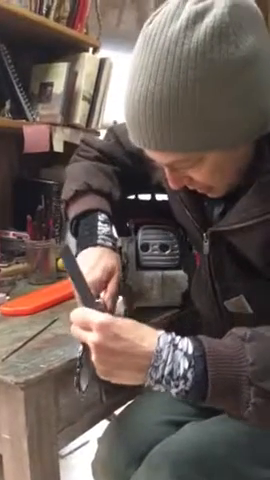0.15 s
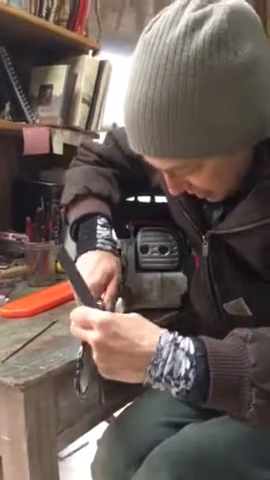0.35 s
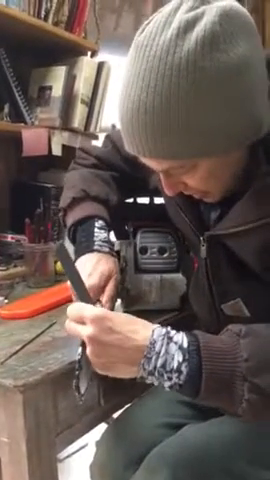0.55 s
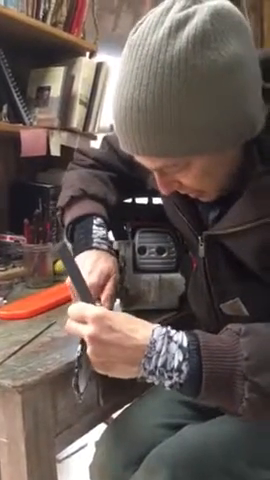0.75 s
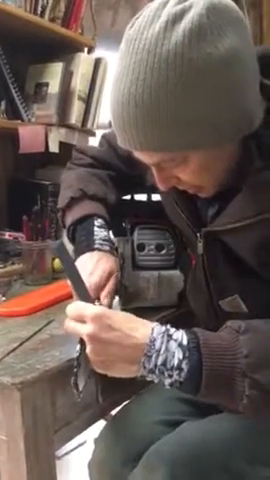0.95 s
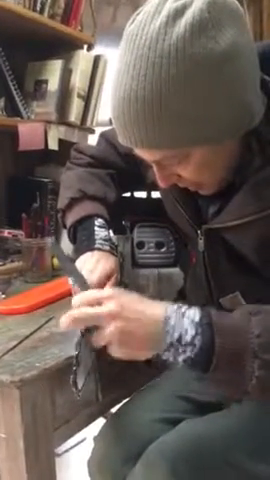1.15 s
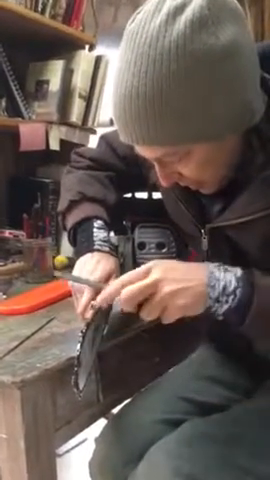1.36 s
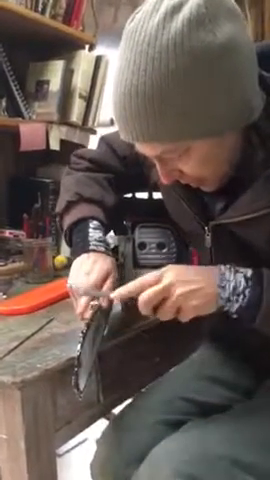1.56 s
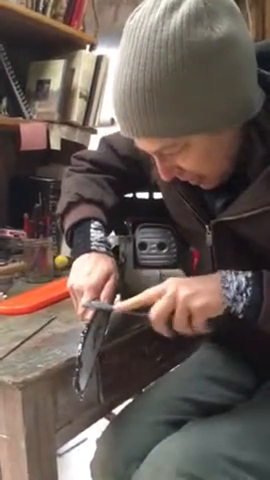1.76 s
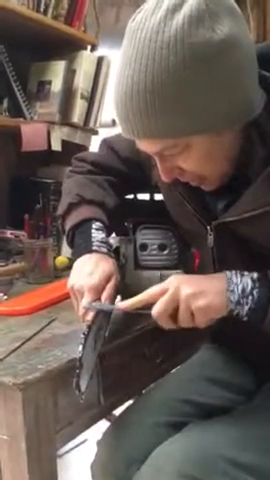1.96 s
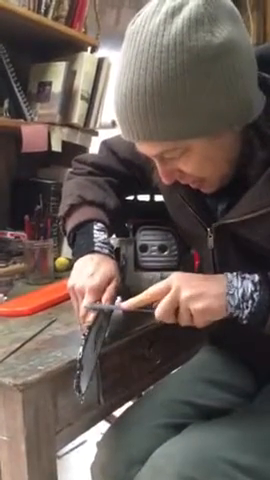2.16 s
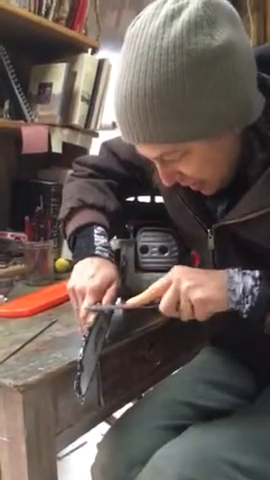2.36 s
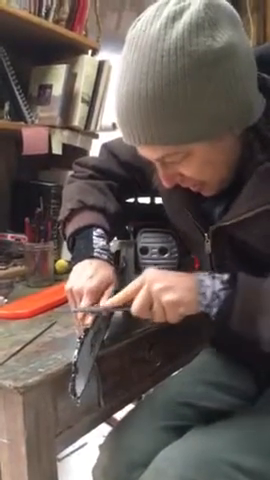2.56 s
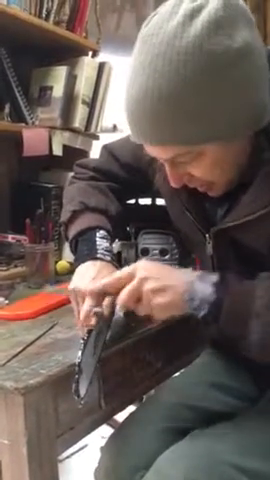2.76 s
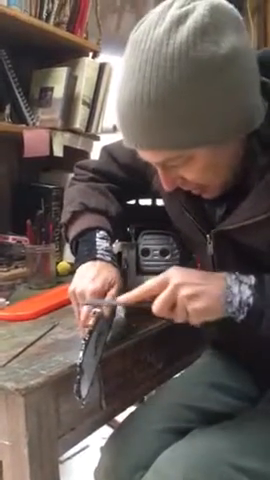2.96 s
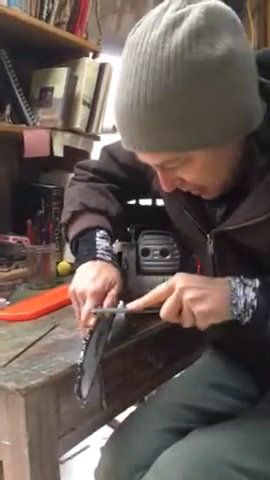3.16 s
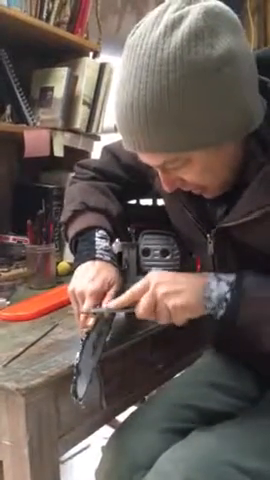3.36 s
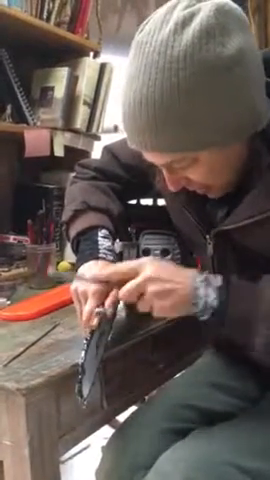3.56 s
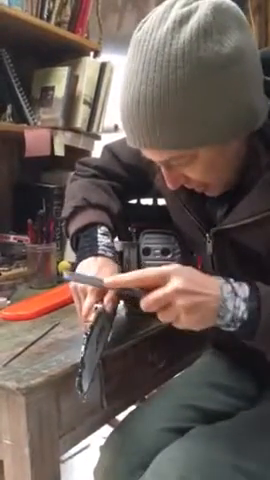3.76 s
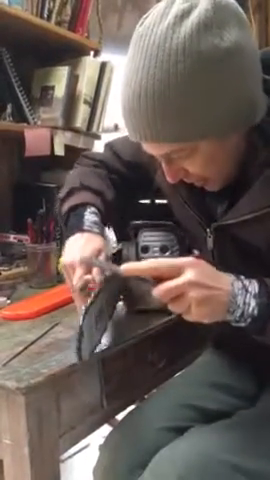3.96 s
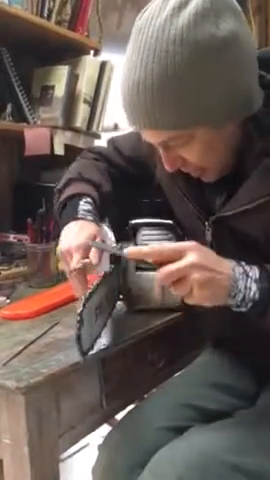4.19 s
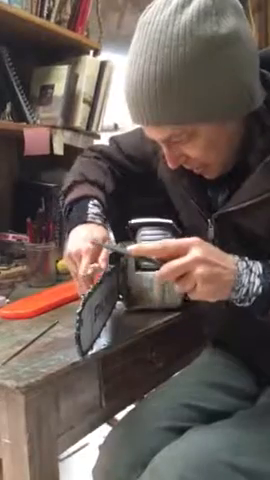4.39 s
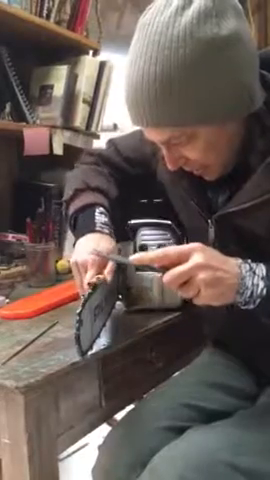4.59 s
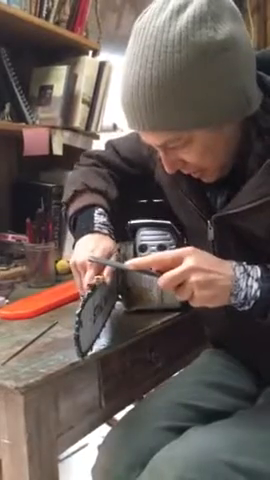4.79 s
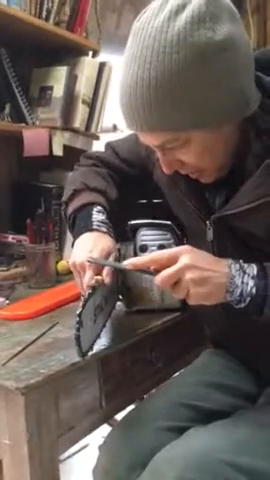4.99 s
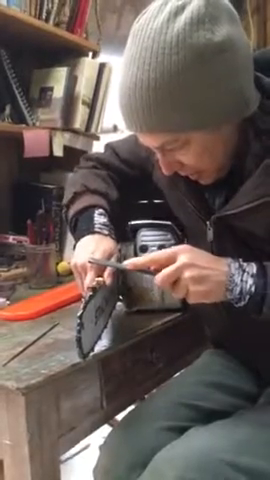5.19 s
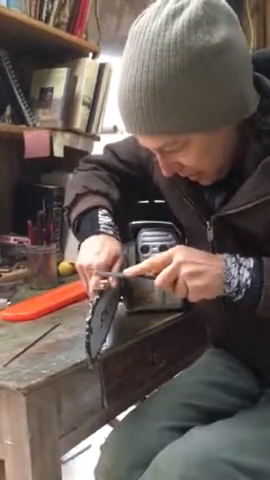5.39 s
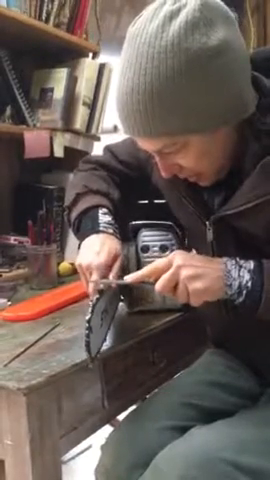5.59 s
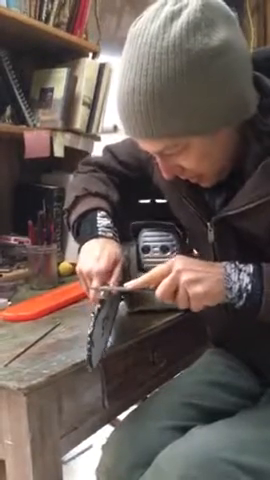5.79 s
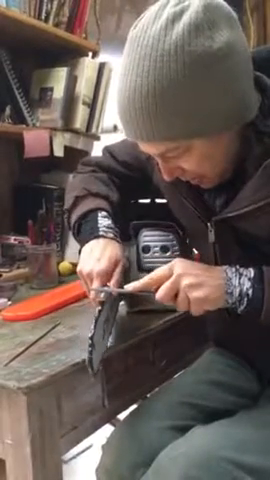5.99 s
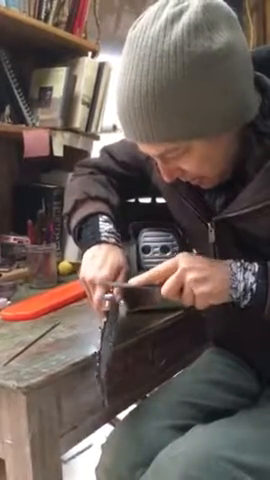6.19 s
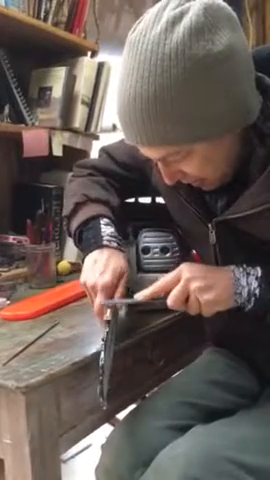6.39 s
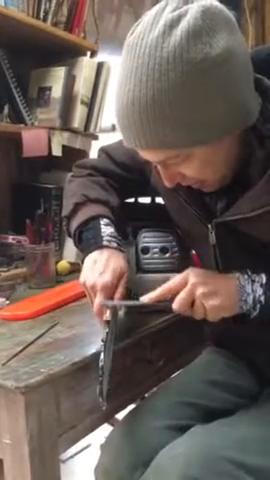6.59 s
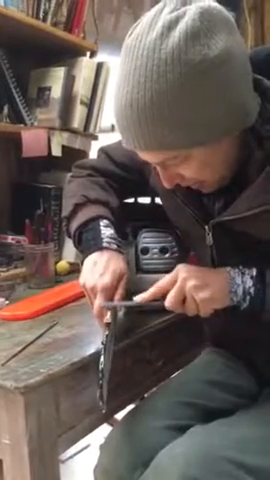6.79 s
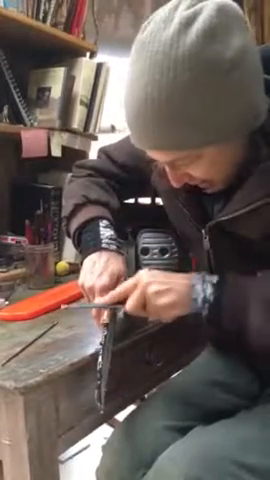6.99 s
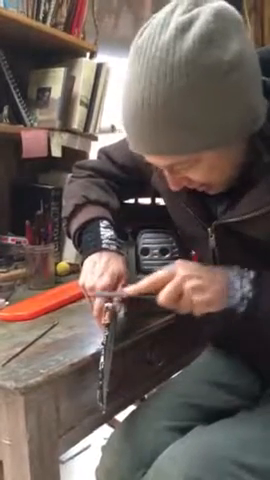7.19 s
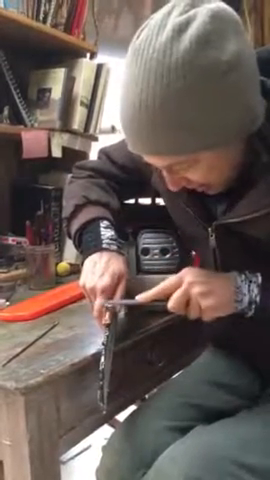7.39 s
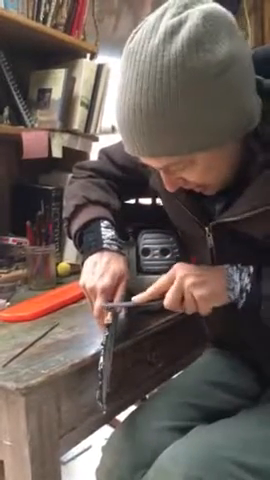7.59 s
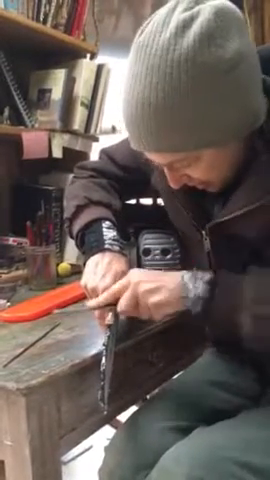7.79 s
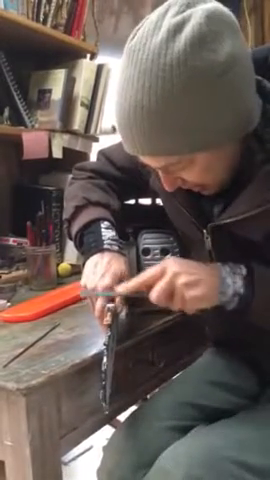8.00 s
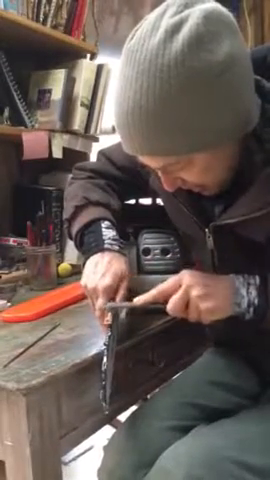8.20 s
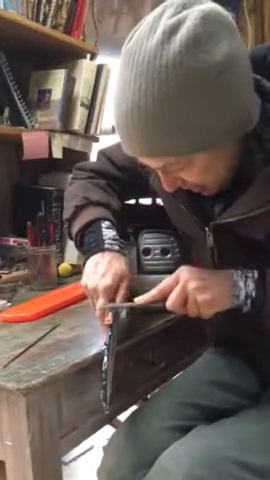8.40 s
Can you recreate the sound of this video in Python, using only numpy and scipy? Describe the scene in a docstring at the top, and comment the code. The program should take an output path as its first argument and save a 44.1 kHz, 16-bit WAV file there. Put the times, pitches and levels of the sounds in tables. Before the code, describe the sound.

Hand filing a saw chain at a workbench, heard by a small nearby microphone. Light ticks, a pause, one hard metallic clack, then two quick uneven rasps, the second squealing briefly. A dull wooden thump and scattered clicks follow, then two lower, coarser scrapes with crisp clicks between. Cloth rustles softly, the bench rumbles faintly, and the short room response is dry and close.

```python
"""A flat steel file dresses a saw chain on a wooden workbench in a small shed.
Damped modes and noise bursts make its clicks on the chain; four strokes rasp as teeth snap off chips
and grit crackles through the resonances of chain and bar, and one stroke squeals at its tooth rate.
Bench modes and low noise make the bumps, a thump and the rumble; wavering sines squeak faintly.
Swelling noise makes the sleeve's swish, and steady noise the quiet background."""
import sys
import numpy as np
from scipy import signal
from scipy.fft import rfft, irfft, next_fast_len
from scipy.io import wavfile
from scipy.ndimage import uniform_filter1d, map_coordinates

SR = 44100
rng = np.random.default_rng(int(sys.argv[2]) if len(sys.argv) > 2 else 0)


def waveform_to_disk(signal):
    """Save audio, clipped to [-1, 1], as 16-bit WAV at the path in sys.argv[1]."""
    frames = np.transpose(np.atleast_2d(signal))
    scaled = np.clip(frames, -1, 1) * 32767
    samples = np.round(scaled).astype(np.int16)
    wavfile.write(sys.argv[1], SR, samples)


N = 372644
TIME = np.arange(N) / SR  # s

# Background spectrum. Each row: frequency in Hz, relative density in dB per Hz.
AMBIENT_SPECTRUM = [(12, -51), (20, -17), (36, -3.5), (60, 1.5), (93, -11.5), (130, -12.5), (228, -19.5),
                    (262, -22), (337, -26.5), (825, -34), (1300, -39), (1960, -39), (2320, -41.5),
                    (4900, -46), (6200, -43.5), (10000, -46.5), (13000, -41.5), (16000, -44)]
AMBIENT_DB = -58

# File meets chain. Each row: start in seconds, level in dB, knock of the bar in dB relative to that level,
# treble sparkle in dB relative to that level before a common cut of 10.5 dB.
CLICKS = [(0.117, -37.5, -23, -11), (0.194, -31.5, -28, -14), (0.306, -32, -27.5, -17),
          (0.319, -37, -26, -16), (0.67, -45.5, -16.5, -22), (0.79, -49.5, -17, -20),
          (1.72, -10.5, -32.5, -13.5), (2.059, -46.5, -16.5, -5), (2.112, -25.5, -27, -13),
          (2.203, -34, -21.5, -16), (2.253, -42, -18.5, -15), (2.588, -17, -26, -20), (3.21, -21, -29, -11),
          (3.927, -30.5, -26, -6.5), (4.615, -36, -20, -23), (4.651, -37, -18, -16.5),
          (4.674, -46, -6, -28), (4.996, -21.5, -30, -19.5), (5.487, -43, -17.5, -16),
          (5.564, -20.5, -36, -21), (5.583, -24.5, -25, -17.5), (6.514, -31, -19.5, -13),
          (6.669, -33.5, -19.5, -21), (6.885, -33, -22, -13), (6.901, -26.5, -25, -15),
          (7.515, -19.5, -25, -16.5), (7.637, -13, -22.5, -18.5), (7.702, -23.5, -27.5, -14),
          (8.359, -32.5, -19, -15)]
# Spectrum of the clack of steel on steel. Each row: frequency in Hz, relative density in dB per Hz.
CLACK_SPECTRUM = [(700, -31), (2500, -21), (4200, -10), (5800, 4), (7500, -1), (8500, 1), (9500, 7),
                  (10500, -2.5), (13000, -0.5), (16000, 3)]
# Spectrum of the knock that drives the bar. Each row: frequency in Hz, relative density in dB per Hz.
KNOCK_SPECTRUM = [(100, -16), (400, -10), (800, -10), (1250, -9.5), (2300, -6), (3500, -7), (6000, -15.5),
                  (12000, -48.5)]
# Modes of the file. Each row: frequency in Hz, relative level in dB, t60 in seconds.
FILE_MODES = [(4405, -10, 0.051), (5570, -4, 0.065), (6330, 0.5, 0.045), (7490, -8.5, 0.029),
              (7700, -9, .15), (9450, 1, 0.048), (11070, -6, 0.049), (12400, -10, 0.047),
              (14600, -13.5, .1), (15200, -6, .05)]
# Modes of the struck cutter link. Each row: frequency in Hz, relative level in dB, t60 in seconds.
LINK_MODES = [(1182.5, -4.5, .1), (1307, -0.5, .15), (1415, -4.5, 0.089)]
# Resonances of chain and guide bar. Each row: centre in Hz, width in Hz, gain in dB over the direct sound.
BAR_RESONANCES = [(952, 27, 5), (1144, 27, 4), (1286, 45, 3.5), (1963, 90, 0.5), (2222, 130, -3.5),
                  (2718, 150, -11), (3730, 410, -2.5), (5887, 260, 5.5), (6420, 260, -0.5),
                  (9310, 250, 2.5)]

# Decay of the shed's answer. Each row: frequency in Hz, t60 in seconds.
SHED_DECAY = [(150, 0.35), (1500, 0.26), (7000, .18), (15000, 0.12)]

# The saw's housing bumps the bench. Each row: start in seconds, level in dB, softness corner in Hz.
BUMPS = [(.232, -46, 600), (0.271, -48, 900), (.703, -55, 1980), (.8, -60.5, 1190), (0.951, -61, 1600),
         (1.814, -49.5, 1530), (2.545, -46, 450), (2.587, -42, 450), (2.984, -51.5, 900), (3.29, -56, 903),
         (4.129, -32, 1255), (4.137, -20, 430), (4.158, -29.5, 258), (4.308, -55.5, 900), (4.42, -59, 1200),
         (4.53, -60, 1400), (4.855, -65, 2400)]
# Modes of the bench. Each row: frequency in Hz, relative level in dB, t60 in seconds.
BENCH_MODES = [(64.5, -4.5, .25), (105, -4, 0.2), (143.2, 4.5, 0.13), (190, -2.5, 0.2), (231, -7.5, .22),
               (351, -12.5, 0.22), (441.4, -8, 0.091), (627, -15.5, 0.127), (798.6, -16, 0.113)]
# The saw rocks on the bench. Each row: time of full strength in seconds, hold in seconds, level in dB.
ROCKING = [(.245, .005, -46.5), (2.54, 0.21, -50), (2.72, 0.081, -45), (3.375, 0.029, -48),
           (3.485, 0.028, -44), (3.575, .02, -50), (6.81, .04, -51), (6.908, 0.077, -42.5),
           (7.085, .035, -39), (7.685, 0.1, -42.5), (7.853, .012, -32)]
# Spectrum of the rocking. Each row: frequency in Hz, relative density in dB per Hz.
RUMBLE_SPECTRUM = [(20, -40.5), (45, -4.5), (70, -11), (108, 4.5), (150, -8.5), (190, -10.5), (235, -9.5),
                   (300, -21.5), (450, -28.5), (1000, -66)]
ROCK_RISE_S, ROCK_RELEASE_S = .089, .29

# Faint squeaks as the saw is shifted. Each row: centre in seconds, pitch in Hz, length in seconds, level in dB.
SQUEAKS = [(0.707, 1950, 0.01, -59.5), (5.204, 1956, 0.0068, -59.5), (5.967, 2170, 0.041, -72),
           (6.169, 1910, 0.08, -71)]

# The filing arm reaches or draws back. Each row: time of full strength in seconds, hold in seconds, level in dB.
SLEEVE_MOVES = [(1.42, 0.26, -68.5), (2.33, .06, -65.5), (2.49, .02, -68), (2.89, 0.077, -67),
                (3.72, .2, -71.5), (4.15, 0.19, -68.5), (4.6, 0.11, -73), (5.36, .1, -76),
                (5.82, 0.047, -72.5), (6.18, 0.096, -70.5), (6.5, 0.074, -65.5), (7.24, .06, -61.5),
                (8.01, 0.087, -60.5)]
# Spectrum of the cloth. Each row: frequency in Hz, relative density in dB per Hz.
CLOTH_SPECTRUM = [(180, -34.5), (300, -4.5), (418, -9.5), (1040, -4.5), (1140, -6), (3580, -10.5),
                  (4590, -16.5), (6000, -12), (13100, -13), (16000, -11)]
SLEEVE_RISE_S, SLEEVE_RELEASE_S = .35, .75

# The file slides lightly into place. Each row: time of full strength in seconds, hold in seconds, level in dB.
TOUCHES = [(2.099, .007, -48.5), (6.67, .002, -58), (6.765, 0.0066, -57), (6.802, 0.019, -51)]
TOUCH_RISE_S, TOUCH_RELEASE_S = .033, .12
# The file bites into the cutter, two to four times in a stroke. Each row: time of full strength in seconds,
# rise in seconds, hold in seconds, hiss level in dB, rasp level in dB, top rate in teeth per second (Hz).
BITES = [(2.547, .07, .028, -37, -41, 1943), (2.594, 0.053, .011, -42.5, -42, 1168),
         (2.672, .08, .048, -39.5, -53, 3700), (2.746, 0.11, .018, -43.5, -47.5, 2200),
         (3.416, .11, .008, -42.5, -43.5, 1961), (3.448, .02, 0.0022, -37, -49, 7280),
         (3.505, .036, .032, -39.5, -50, 3676), (3.554, 0.054, .005, -50, -49.5, 2199),
         (6.9, .025, .022, -46, -53.5, 651.6), (7.01, .17, .016, -36, -41, 934),
         (7.743, .12, .02, -48.5, -57, 700.2), (7.812, .11, .018, -36, -36.5, 929.3),
         (7.845, 0.049, .022, -36.5, -37.5, 1310)]
# Spectrum of the scrape ahead of the bar. Each row: frequency in Hz, density in dB per Hz.
RASP_SPECTRUM = [(100, -37), (250, -5), (450, -10.5), (700, -2.5), (1000, -8), (1500, -7), (2500, -9),
                 (3700, -10), (4800, -12.5), (6200, -9.5), (8000, -9.5), (10500, -12.5), (13000, -8),
                 (15500, -14.5)]
HISS_RELEASE_S, RASP_RELEASE_S = .16, .18  # alike in every bite, the hiss dying first
CATCH_SHARE, SLOW_DOWN_S = .4, .063  # teeth catch for this last share of the rise; time to half speed after
GRIP_HZ, SKIM_HZ = 440, 1499  # below the first tooth rate the file lets go and skims at the second

# The squeal in the fastest bite sounds while the tooth rate stays above LOCK_HZ.
SQUEAL_S, SQUEAL_RISE_S, SQUEAL_HOLD_S, SQUEAL_RELEASE_S = 3.459, .019, .034, .03
SQUEAL_DB, LOCK_HZ = -28, 5080  # level before the flare
CUTTER_HZ, CUTTER_WIDTH_HZ, CUTTER_DB = 6350, 200, 7  # the squeal flares as it crosses this resonance

BASS_CORNER_HZ, TOP_HZ = 22, 15850


def amp(db):
    """Amplitude ratio of a level in dB."""
    return 10 ** (np.asarray(db) / 20)


def unit(x):
    """Normalisation to an rms of 1."""
    return x / np.sqrt(np.mean(x ** 2) + 1e-20)


def along(points, hz):
    """Interpolation of (Hz, value) points on a logarithmic frequency axis."""
    f, v = np.transpose(points)
    return np.interp(np.log(hz + 1), np.log(f + 1), v)


def wobble(rate):
    """Smooth random modulation: a spline through `rate` random knots a second."""
    knots = rng.standard_normal(int(N * rate / SR) + 4)
    return map_coordinates(knots, [TIME * rate])


def filtered(x, response):
    """Linear filtering: the spectrum of x times a response of frequency."""
    size = next_fast_len(len(x) + 8192)
    spectrum = rfft(x, size) * response(np.fft.rfftfreq(size, 1 / SR))
    return irfft(spectrum, size)[:len(x)]


def noise(spectrum, size=N):
    """Coloured noise: white noise shaped by a spectrum, at an rms of 1."""
    white = rng.standard_normal(size)
    return unit(filtered(white, lambda hz: amp(along(spectrum, hz))))


def fade(t, t60):
    """Exponential decay, falling 60 dB in t60."""
    return np.exp(-np.log(1000) * t / t60)


def ring(modes, t, scatter_db, blur=0):
    """Modal vibration: damped sines of random strength and sign; loose contact blurs their phase."""
    steps = rng.standard_normal((len(modes), len(t)))
    drift = blur * np.cumsum(steps, axis=1) / np.sqrt(SR)
    strengths = amp(scatter_db * rng.standard_normal(len(modes)))
    gains = strengths * rng.choice([-1, 1], len(modes))
    sound = np.zeros(len(t))
    for (hz, db, t60), gain, slip in zip(modes, gains, drift):
        sound += gain * amp(db) * fade(t, t60) * np.sin(2 * np.pi * hz * t + slip)
    return sound


def add(track, s, sound):
    """Superposition: mix a sound in at s seconds."""
    part = track[round(s * SR):][:len(sound)]
    part += sound[:len(part)]


def envelope(s, rise, hold, release):
    """Gaussian onset to full strength at s, hold, exponential decay; rise and release each span 65 dB."""
    gain = np.zeros(N)
    span = slice(*np.searchsorted(TIME, [s - rise, s + hold + release]))
    t = TIME[span] - s
    distance = np.where(t < 0, (t / rise) ** 2, np.maximum(t - hold, 0) / release)
    gain[span] = fade(distance, .92)
    return gain


def swells(rows, rise, release):
    """Power addition of like gestures (s, hold s, dB) that share one rise and release."""
    power = sum((amp(db) * envelope(s, rise, hold, release)) ** 2 for s, hold, db in rows)
    return np.sqrt(power)


def patchy(x, depth_db):
    """Moving point of excitation: the contact wanders along the steel, favouring ever different partials."""
    z = signal.stft(x, nperseg=512)[2]
    field = uniform_filter1d(rng.standard_normal(z.shape), 5, 0)  # smooth in frequency
    field = uniform_filter1d(field, 11, 1)  # smooth in time
    return signal.istft(z * amp(depth_db * unit(field)), nperseg=512)[1][:len(x)]


def bar(hz):
    """Resonance: direct sound of the contact plus band-pass modes of chain and guide bar."""
    response = 1
    for centre, width, db in BAR_RESONANCES:
        damping = 1j * hz * width
        response = response + amp(db) * damping / (centre ** 2 - hz ** 2 + damping)
    return response


def ambience():
    """Stationary noise: a mostly low, quiet background whose level drifts slowly."""
    return amp(AMBIENT_DB) * noise(AMBIENT_SPECTRUM) * amp(.94 * wobble(1.997))


def clicks():
    """Impact of steel on steel: a crack and short clack, the hand-damped file, a knock of bar and link."""
    track, t = np.zeros(N), np.arange(SR // 5) / SR
    for s, db, knock_db, sparkle_db in CLICKS:
        burst = unit(patchy(noise(CLACK_SPECTRUM, size=len(t)), depth_db=3.5))
        # the loose chain goes on shivering after the blow
        clack = burst * (amp(-8.5) * fade(t, .0097) + amp(-10) * fade(t, .025) + amp(-30.5) * fade(t, .16))
        # the harder the blow, the more freely the file rings
        steel = clack + amp(-14 + .5 * db) * ring(FILE_MODES, t, scatter_db=2.5, blur=19)
        # a sharp tooth tip sparkles, a flat contact does not
        body = filtered(steel, lambda hz: 1 / (1 + (hz / 10600) ** 10))
        sparkle = amp(sparkle_db - 10.5) * unit(steel - body)
        shove = noise(KNOCK_SPECTRUM, size=len(t)) * (fade(t, .048) + amp(-17) * fade(t, .21))
        link = amp(-5 + .3 * db) * ring(LINK_MODES, t, scatter_db=2.5, blur=14)
        knock = amp(knock_db) * (filtered(shove, bar) + link)
        # light contacts build up more slowly than hard ones
        attack = 1 - fade(t, .0012 * amp(-.5 * db))
        add(track, s, amp(db) * (body + sparkle + knock) * attack)
    return track


def shed(x):
    """Reverberation: convolution with decaying noise, delayed 5 ms, whose treble dies first."""
    _, t, z = signal.stft(rng.standard_normal(SR // 2), SR, nperseg=256)
    hz = np.fft.rfftfreq(256, 1 / SR)
    decay = fade(t, along(SHED_DECAY, hz)[:, None])
    tail = signal.istft(z * decay, SR, nperseg=256)[1]
    answer = np.pad(tail / np.linalg.norm(tail), (SR // 200, 0))
    return signal.fftconvolve(x, answer)[:N]


def bench():
    """Forced vibration of a board: modes and a thud boom at each bump, low noise rumbles under the rocking."""
    track, t = np.zeros(N), np.arange(SR // 3) / SR
    for s, db, corner_hz in BUMPS:
        spectrum = [(40, -25), (110, 0), (corner_hz, -4), (3 * corner_hz, -26), (16000, -80)]  # Hz, dB per Hz
        thud = noise(spectrum, size=len(t)) * fade(t, .1)
        boom = amp(-6) * ring(BENCH_MODES, t, scatter_db=2) + amp(-5.5) * thud
        attack = 1 - fade(t, .0073)
        add(track, s, amp(db) * boom * attack)
    rumble = swells(ROCKING, ROCK_RISE_S, ROCK_RELEASE_S) * noise(RUMBLE_SPECTRUM)
    return track + rumble


def squeaks():
    waver = np.cumsum(1 + .028 * wobble(500)) / SR
    track = np.zeros(N)
    for s, hz, length, db in SQUEAKS:
        swell = np.exp(-(2 * (TIME - s) / length) ** 2)
        track += amp(db) * swell * np.sin(2 * np.pi * hz * waver)
    return track


def sleeve():
    """Friction noise of cloth: a soft swish that swells as the arm moves."""
    moves = swells(SLEEVE_MOVES, SLEEVE_RISE_S, SLEEVE_RELEASE_S)
    return moves * noise(CLOTH_SPECTRUM) * amp(wobble(35))


def tooth_rate():
    """Kinematics of the stroke: speed gathers into each bite, holds, then slows until the file lets go."""
    rate = np.zeros(N)
    for s, rise, hold, _, _, top_hz in BITES:
        away = np.maximum((s - TIME) / rise, (TIME - s - hold) / SLOW_DOWN_S)
        bite_rate = top_hz / (1 + np.maximum(away, 0) ** 2)
        rate = np.where(TIME < s - CATCH_SHARE * rise, rate, bite_rate)
    return np.where(rate > GRIP_HZ, rate, SKIM_HZ)


def tooth_phase(jitter):
    """Phase as integrated rate: the count of teeth passed while the speed trembles, and the smooth rate."""
    rate = tooth_rate()
    tremble = np.exp(jitter * (wobble(900) + .5 * wobble(90)))
    return np.cumsum(rate * tremble) / SR, rate


def scrape(jitter, tooth_db, grit_db, chatter_db):
    """Impulsive cutting: each tooth snaps off a chip, less deeply at speed; grit crackles between snaps."""
    phase, rate = tooth_phase(jitter)
    bite = amp(2 * rng.standard_normal(N) + 2.8 * wobble(70)) / (1 + (rate / 2600) ** 4)
    # dividing by the root of the rate keeps the power from growing with the count of snaps
    snaps = np.diff(np.floor(phase), prepend=0) * bite / np.sqrt(rate / SR)
    grit = unit(rng.standard_normal(N) * amp(grit_db * wobble(2500)))
    return (amp(tooth_db) * snaps + grit) * amp(chatter_db * wobble(220))


def filing():
    """Source and resonator: bites and light touches excite the bar; hiss and low rasp have their own levels."""
    contact = patchy(scrape(jitter=.055, tooth_db=1, grit_db=2.5, chatter_db=1.5), depth_db=3)
    steel = filtered(contact, lambda hz: amp(along(RASP_SPECTRUM, hz)) * bar(hz))
    low = filtered(steel, lambda hz: 1 / (1 + (hz / 3300) ** 4))
    hiss, rasp = unit(steel - low), unit(low)
    hiss_power, rasp_power = np.zeros(N), np.zeros(N)
    for s, rise, hold, hiss_db, rasp_db, _ in BITES:
        hiss_power += (amp(hiss_db) * envelope(s, rise, hold, HISS_RELEASE_S)) ** 2
        rasp_power += (amp(rasp_db) * envelope(s, rise, hold, RASP_RELEASE_S)) ** 2
    touches = swells(TOUCHES, TOUCH_RISE_S, TOUCH_RELEASE_S) * unit(hiss + amp(-6) * rasp)
    return np.sqrt(hiss_power) * hiss + np.sqrt(rasp_power) * rasp + touches


def squeal():
    """Periodic excitation: the tooth rate sings out, falling and growing ragged until the lock breaks."""
    phase, rate = tooth_phase(jitter=.014)
    raggedness = .14 * wobble(1300) * np.minimum(5500 / rate, 2) ** 4
    angle = 2 * np.pi * phase + raggedness
    tone = unit(np.sin(angle) + amp(-21) * np.sin(2 * angle))
    flare_db = CUTTER_DB / (1 + ((rate - CUTTER_HZ) / CUTTER_WIDTH_HZ) ** 2)
    lock = envelope(SQUEAL_S, SQUEAL_RISE_S, SQUEAL_HOLD_S, SQUEAL_RELEASE_S)
    lock = lock / (1 + (LOCK_HZ / rate) ** 40)
    return lock * tone * amp(SQUEAL_DB + flare_db + 3 * wobble(420))


def scene():
    """Superposition of the work at the bench, the shed's answer, the sleeve and the background."""
    work = clicks() + bench() + squeaks() + filing() + squeal()
    return (work + amp(-11) * shed(work) + sleeve() + ambience())[None]


def record(dry):
    """Band limitation: a small microphone loses the deepest bass, and a steep low-pass ends the treble."""
    thinned = filtered(dry[0], lambda hz: (1j * hz / (1j * hz + BASS_CORNER_HZ)) ** 3)
    return filtered(thinned, lambda hz: 1 / np.sqrt(1 + (hz / TOP_HZ) ** 200))[None]


dry = scene()
out = record(dry)
waveform_to_disk(out)
```